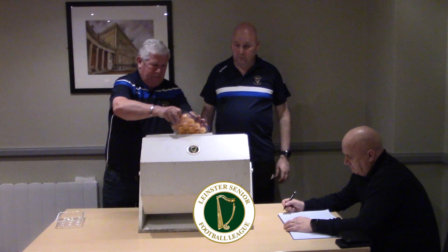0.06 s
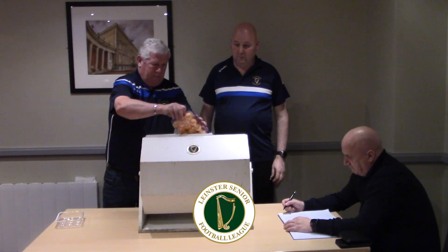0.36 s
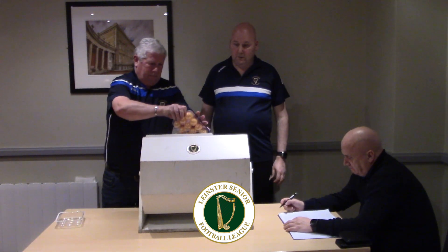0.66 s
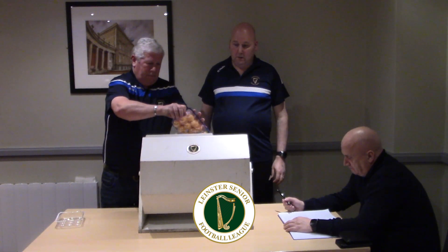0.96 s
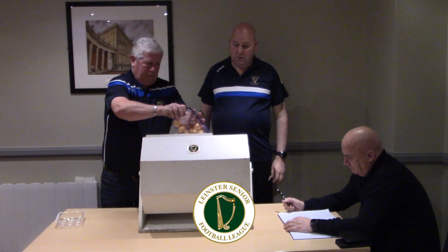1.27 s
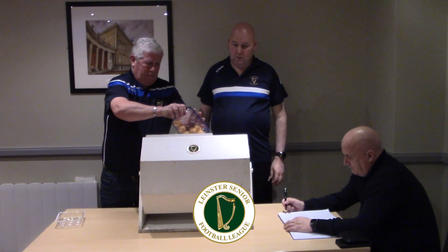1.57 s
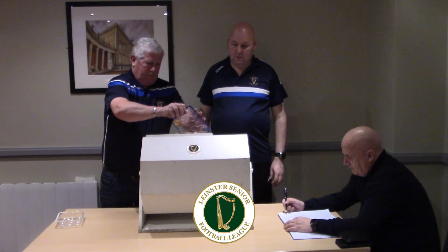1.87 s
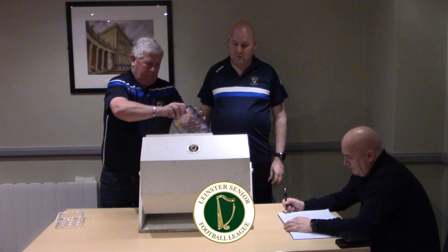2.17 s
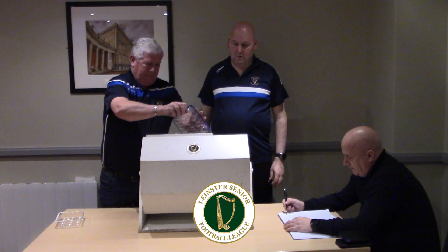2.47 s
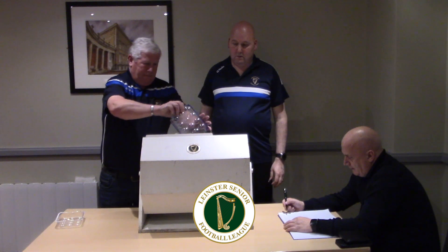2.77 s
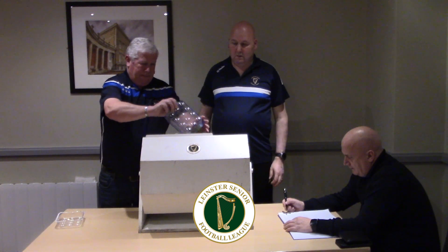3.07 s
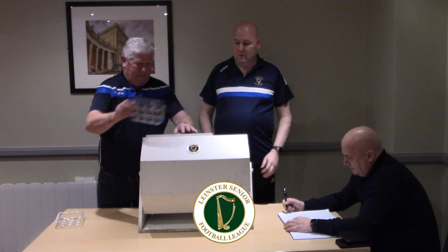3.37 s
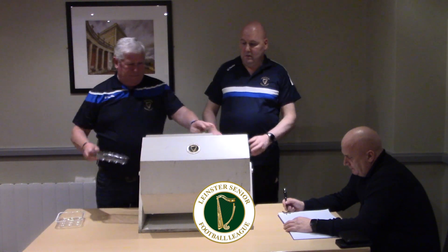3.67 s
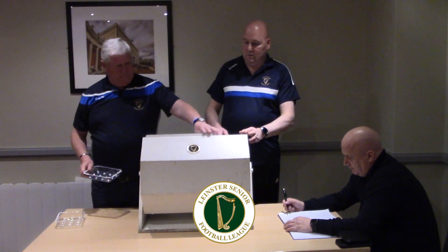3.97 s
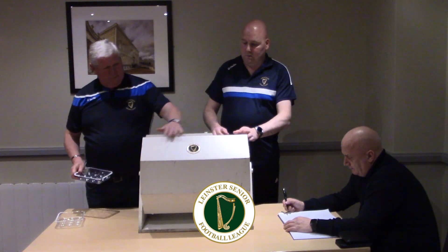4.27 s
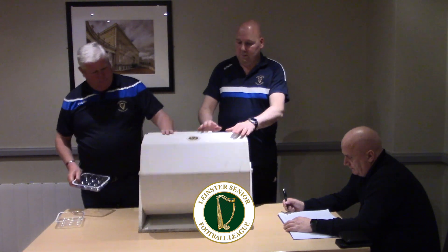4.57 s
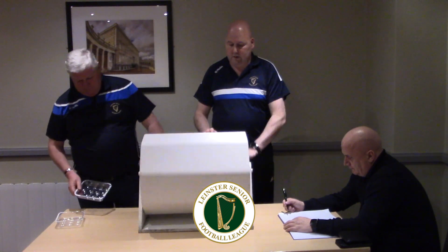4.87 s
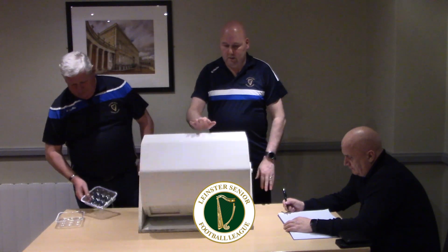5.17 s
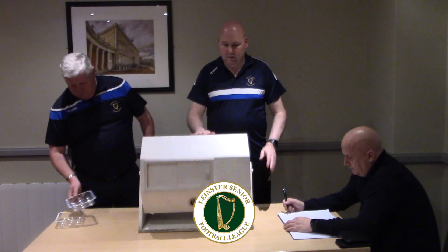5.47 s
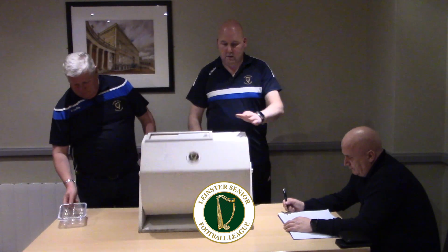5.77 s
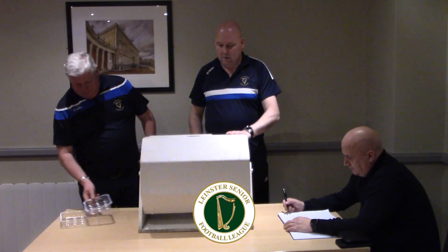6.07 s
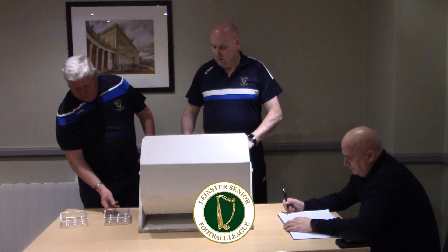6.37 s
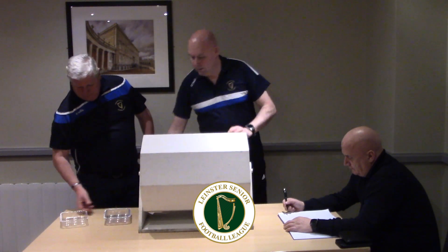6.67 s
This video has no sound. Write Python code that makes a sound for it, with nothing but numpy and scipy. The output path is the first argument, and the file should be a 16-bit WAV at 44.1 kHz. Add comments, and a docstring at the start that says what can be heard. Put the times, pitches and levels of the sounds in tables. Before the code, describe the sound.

For the first second a thin plastic tray crinkles faintly and balls click lightly inside it. From about 1.2 seconds hollow plastic balls drop into a wooden drum, knocking on the panels and clacking against each other with tiny high pings. The clatter is thickest from 2 to 3 seconds and dies away by about 3.7. The hatch bangs shut in a few knocks between 3.8 and 4 seconds, with a short hinge groan and a ball rocking lightly; the latch clicks at 4.4. Around 4.7 to 5 seconds the axle gives two brief groans as the drum starts turning. From then until the end, near 7 seconds, the balls tumble inside in a dense run of knocks and clacks over a low rolling rumble, the highest treble gradually dulling. A small room echoes the blows over a soft, steady hush.

```python
"""A thin plastic tray crinkles and clicks as hollow plastic balls tip out of it into a wooden draw drum.
The balls knock on the wood, clack together and ping. The hatch bangs shut, its hinge groans, a ball rocks
and the latch clicks. The drum groans on its axle as it starts to turn, and the balls roll and tumble
inside, slowly losing their highest treble. A small room echoes the blows over a soft, steady hush."""
import sys
import numpy as np
from scipy import signal
from scipy.fft import rfft, irfft, next_fast_len
from scipy.io import wavfile
from scipy.ndimage import uniform_filter1d, minimum_filter1d

SR = 44100
rng = np.random.default_rng(int(sys.argv[2]) if len(sys.argv) > 2 else 0)


def unload_audio(sound):
    """Save the sound as a 16-bit wav file, at the path given as the first command line argument."""
    columns = np.transpose(np.atleast_2d(sound))
    # keep every value between -1 and 1, then stretch to whole-number steps
    steps = np.round(np.clip(columns, -1, 1) * 32767)
    wavfile.write(sys.argv[1], SR, steps.astype(np.int16))


N = 305568


# Hard blows as the balls drop from the tray, and later from the turning walls.
# start_s, force_db, clack_db, tick_db (clack and tick are added to the force)
BALL_BLOWS = [(1.208, 0.5, -16.5, -25.5), (1.284, 1.5, -21, -25.5), (1.307, 3, -17, -26.5),
              (1.408, 0.5, -28, -31), (1.457, -3.5, -30, -34), (1.48, 5, -15, -26),
              (1.542, -6.5, -11.5, -20.5), (1.625, 3.5, -14, -29), (1.664, 1.5, -9, -23),
              (1.732, -0.5, -12.5, -23.5), (1.781, -2.5, -12.5, -27.5), (1.947, 3, -11.5, -25.5),
              (2.019, 2, -13.5, -24), (2.069, 4.5, -8, -21.5), (2.11, 2, -26, -31), (2.226, 1, -13, -30.5),
              (2.323, 3, -13, -26), (2.376, 7, -15.5, -26.5), (2.459, -1.5, -12, -26.5),
              (2.577, 0.5, -9, -28.5), (2.651, -0.5, -8, -24.5), (2.727, -8, -5, -15.5),
              (2.754, 3, -10, -26.5), (2.865, -6.5, -9.5, -27), (2.941, 2, -16.5, -24.5),
              (2.987, -3, -11, -29), (3.098, -10.5, -9.5, -26), (3.215, -4, -11, -30),
              (3.286, -7.5, -10.5, -29), (3.335, -4.5, -12.5, -35), (3.453, -6.5, -16, -31),
              (3.481, -1.5, -12, -27), (3.536, -1.5, -13, -29), (4.887, -4, -8.5, -27),
              (4.912, 4, -10.5, -29), (5.062, -0.5, -12.5, -24.5), (5.079, 3.5, -33, -29),
              (5.104, 8.5, -28, -29), (5.165, -2.5, -11, -29), (5.287, -4.5, -9.5, -21.5),
              (5.302, 4, -9.5, -27.5), (5.44, -1.5, -9.5, -24.5), (5.477, 0.5, -28, -34),
              (5.69, 1.5, -8.5, -26.5), (5.747, 1.5, -12, -46), (5.84, -0.5, -11, -22),
              (5.971, -1.5, -11.5, -22.5), (6.054, -11.5, -6, -22), (6.092, 0, -12.5, -36),
              (6.176, 2, -9, -29), (6.411, 1, -14, -32), (6.526, 1.5, -14.5, -29.5), (6.545, -8, -13, -27)]
def falling_balls():
    """Balls hit the wood and each other; once the hatch shuts, one rocks in three growing knocks."""
    rocking = [(4.133 + k * 0.0785, -14 + k * 1.5, -23, -51) for k in range(3)]
    return blows(BALL_BLOWS + rocking, knock_db=-5.5, clack_db=-1.5, tick_db=-1.5,
                 knock_s=0.083, clack_s=0.075, tick_s=0.12,
                 rise_s=0.0019, tick_rise_s=0.00039, snap=0.17, tick_snap=0.17, contrast=1.96)


def blows(rows, knock_db, clack_db, tick_db, knock_s, clack_s, tick_s,
          rise_s, tick_rise_s, snap, tick_snap, contrast=1):
    """Each blow shakes the panels (knock), the hollow shells (clack) and the spot it hits (tick)."""
    knocks, clacks, ticks = np.zeros((3, N))
    usual_clack = np.median([clack for _, _, clack, _ in rows])
    for start_s, force, clack, tick in rows:
        # ball on wood hardly clacks, ball on ball does
        hardness = usual_clack + contrast * (clack - usual_clack)
        add(knocks, start_s, amp(force + knock_db) * burst(knock_s, rise_s, snap))
        add(clacks, start_s, amp(force + hardness + clack_db) * burst(clack_s, rise_s, snap))
        add(ticks, start_s, amp(force + tick + tick_db) * burst(tick_s, tick_rise_s, tick_snap))
    return np.array([knocks, clacks, ticks])


def burst(ring_s, rise_s, snap, size=6144):
    """One contact: a sharp snap, then jumbled waves that build up and fade by 60 dB in ring_s."""
    t = np.arange(size) / SR
    fade = amp(-60 * t / ring_s) * (1 - np.exp(-t / rise_s))
    waves = unit_level(rng.standard_normal(size) * fade) * np.sqrt(np.mean(fade ** 2))
    waves[0] += snap * np.linalg.norm(fade)
    return waves


# How hard the heap is stirred as it fills, settles, then tumbles: time_s, level_db
STIRRING = [(0.95, -53), (1.15, -38), (1.45, -36), (1.8, -25), (1.929, -34), (2.02, -13), (2.42, -13),
            (2.55, -19), (3.2, -18), (3.66, -20.5), (3.78, -37), (4.76, -37), (4.82, -22), (5.03, -30),
            (5.12, -12.5), (5.9, -12.5), (6.699, -13.5), (6.93, -17)]
TICK_SLOPE = 0.88  # dB of tick for each dB of stirring
def jostling_heap(per_s=70, spread_db=8.5):
    """Light bumps of uneven strength and tone fill the gaps between the hard blows."""
    parts = np.zeros((3, N))
    part_spreads_db = (7.5, 7.5, 13)  # knock, clack, tick
    for k, (late, strength, *shares) in enumerate(rng.random((900, 5))):
        bump = amp(spread_db * strength) * burst(ring_s=0.06, rise_s=0.0005, snap=0.56, size=2048)
        for part, share, range_db in zip(parts, shares, part_spreads_db):
            add(part, (k + 2 * late) / per_s, amp(range_db * share) * bump)
    stir_db = over_time(STIRRING)
    return unit_level(parts) * amp([stir_db - 4, stir_db - 9, TICK_SLOPE * stir_db - 27])


# The tones of one hollow ball: pitch_ratio, level_db
SHELL_TONES = [(1, 3), (1.07, -3.5), (1.42, -13.5), (1.72, -26), (2.02, -20)]
def shell_pings(light_count=420, middle_hz=6045, ring_s=0.0086, spread_db=14):
    """At hard blows and light touches a ball pings at its own pitch; the spot hit favours some tones."""
    times_s, stir_db = np.transpose(STIRRING)
    when, strength = rng.random((light_count, 2)).T
    light_s = times_s[0] + (times_s[-1] - times_s[0]) * when
    light_db = TICK_SLOPE * np.interp(light_s, times_s, stir_db) - 7 + 20 * (strength - 1)
    hits = [(start_s, force + tick + 13.5) for start_s, force, _, tick in BALL_BLOWS]
    hits += zip(light_s, light_db)
    pitches_hz = middle_hz * (1 + 0.1 * rng.uniform(-1.08, 1, len(hits)))
    out, t = np.zeros(N), np.arange(2048) / SR
    swell = 1 - np.exp(-t / 0.0009)
    for (start_s, level_db), pitch_hz in zip(hits, pitches_hz):
        spot_db = spread_db * (rng.random(len(SHELL_TONES)) - 1)
        ping = sum(amp(tone_db + cut_db) * np.sin(2 * np.pi * pitch_hz * ratio * t)
                   for (ratio, tone_db), cut_db in zip(SHELL_TONES, spot_db))
        add(out, start_s, amp(level_db - 60 * t / ring_s) * swell * ping)
    return out


# The tone of each part of a blow: pitch_hz, level_db
KNOCK_TONE = [(100, -44), (200, -42.5), (280, -25), (345, -7.5), (480, -5), (600, -3), (800, 0.5), (930, 0),
              (1300, 0.5), (1650, -3.5), (1900, -14.5), (3000, -20), (8000, -75.5)]
CLACK_TONE = [(150, -97), (500, -80.5), (1400, 1.5), (1750, 3.5), (2300, 2.5), (2700, -4.5), (3200, -15.5),
              (3800, -18.5), (4600, -20.5), (8000, -39), (16000, -85)]
TICK_TONE = [(150, -97), (1000, -88), (2800, 10.5), (4500, 5), (6000, -0.5), (7200, -2), (8500, -1.5),
             (10500, -6.5), (13000, -10), (16000, -19)]
# Pitches at which the wooden drum rings: pitch_hz, width_hz, boost_db
DRUM_RINGS = [(361.6, 10.8, 8.5), (399.1, 22.3, 11), (460, 37, 2), (544, 15, 5), (680, 36, 4.5),
              (770, 35, 3), (747, 23, 0), (843, 35.4, 10), (1013, 28, 8), (1128, 66, 3.5), (1210, 13, 0.5),
              (1270, 41, 4.5), (1325, 42, 2.5), (1583, 48, 2), (1694, 73, 6), (1645, 37, -12),
              (1950, 57, 6), (1993, 34, 2), (2240, 180, 2.5), (2495, 65, 3), (2800, 210, 0.5),
              (3630, 530, 2), (8330, 360, 2.5)]
def wooden_body(parts, rings=DRUM_RINGS, tick_tone=TICK_TONE):
    """Knock, clack and tick all ring the same wood: the drum, unless other rings are given."""
    tones = (KNOCK_TONE, CLACK_TONE, tick_tone)
    return sum(colour(part, tone, rings) for part, tone in zip(parts, tones))


# How the shut hatch changes the sound from inside: pitch_hz, gain_db
SHUT_TONE = [(3000, 2.5), (6000, 2), (8500, 0), (11000, -4.5), (13000, -10), (16000, -13)]
def behind_hatch(sound, start_s=4.3, change_s=2.03):
    """Behind the shut hatch the highest treble slowly dulls, while the rest grows a little louder."""
    size = next_fast_len(N)
    gain = amp(at_pitch(SHUT_TONE, np.fft.rfftfreq(size, 1 / SR)))
    dull = irfft(rfft(sound, size) * gain, size)[:N]
    blend = np.clip((np.arange(N) / SR - start_s) / change_s, 0, 1)
    return sound + blend * (dull - sound)


# The hatch shutting and latching: start_s, force_db, clack_db, tick_db
HATCH_BLOWS = [(3.767, -1, -9.5, -42), (3.784, -6, -5, -42), (3.907, -3.5, -15.5, -38),
               (4.003, -3.5, -8.5, -47.5), (4.022, 2, -23, -46), (4.387, -17.5, -7, -28),
               (4.427, -18.5, -3, -11.5)]
# Pitches at which the hatch rings: pitch_hz, width_hz, boost_db
HATCH_RINGS = [(401, 21, 12.5), (435, 12, 6), (493, 20, 6), (645, 49, 7), (715, 33, -11), (844, 45, 3.5),
               (977, 44, 9), (1230, 75, 4.5), (1600, 110, 0), (2420, 110, 0), (3000, 180, 2)]
# The tone of the ticks of the hatch and its catch: pitch_hz, level_db
LATCH_TONE = [(150, -60), (1000, -29), (2900, 5.5), (4500, -1.5), (6000, -1), (8500, -4), (10500, -11.5),
              (13000, -20), (16000, -34)]
def hatch():
    """The hatch bangs shut, then its catch clicks."""
    parts = blows(HATCH_BLOWS, knock_db=-9.5, clack_db=-1, tick_db=10,
                  knock_s=0.12, clack_s=0.088, tick_s=0.065,
                  rise_s=0.0044, tick_rise_s=0.0009, snap=0.14, tick_snap=0.17)
    return wooden_body(parts, HATCH_RINGS, LATCH_TONE)


# Light blows as the tray tips: start_s, force_db, clack_db, tick_db
TRAY_BLOWS = [(0.061, -22, -23, -24), (0.122, -17.5, -18, -23.5), (0.298, -36.5, -7, -9),
              (0.398, -28.5, -27.5, -29), (0.432, -45, -12, -11), (0.634, -38, -14, -17.5),
              (0.801, -22.5, -14, -21), (0.936, -22.5, -14.5, -16.5), (1.059, -16, -6.5, -15),
              (1.139, -13.5, -15, -21)]
def tipping_tray():
    """Balls click in the tipping tray and ring the drum."""
    parts = blows(TRAY_BLOWS, knock_db=-14, clack_db=-5.5, tick_db=-0.5,
                  knock_s=0.11, clack_s=0.22, tick_s=0.11,
                  rise_s=0.0017, tick_rise_s=0.0011, snap=0.32, tick_snap=0.32)
    return wooden_body(parts)


# The hinge groans, then the axle: start_s, length_s, first_slips_per_s, last_slips_per_s, level_db
GROANS = [(4.006, 0.176, 111, 121, -20.5), (4.706, 0.26, 117, 97, -25.5), (4.894, 0.123, 101, 110, -17.5)]
# The tone of a groan: pitch_hz, level_db
GROAN_TONE = [(100, -63), (210, -35), (320, -21), (400, 6), (480, -1.5), (545, -23), (605, 2.5), (680, -3),
              (1100, -13), (2000, -44), (5000, -70)]
def groans(jitter=0.011, attack_s=0.027, release_s=0.029, fade_db_per_s=49):
    """A dry bearing sticks and slips almost evenly, so the wood groans at a sliding pitch."""
    out = np.zeros(N)
    for start_s, length_s, first_hz, last_hz, level_db in GROANS:
        t = np.arange(0, length_s, 1 / SR)
        waver = unit_level(uniform_filter1d(rng.standard_normal(SR), size=400))[:len(t)]
        slip_hz = np.linspace(first_hz, last_hz, len(t)) * (1 + jitter * waver)
        cycles = np.cumsum(slip_hz) / SR
        slips = sum(np.cos(2 * np.pi * k * cycles) for k in range(1, 16))
        groan = unit_level(colour(slips, GROAN_TONE)[:len(t)])
        grip = np.minimum(t / attack_s, 1) * np.minimum((length_s - t) / release_s, 1)
        add(out, start_s, groan * grip * amp(level_db - fade_db_per_s * t))
    return out


# How loudly the balls roll: time_s, level_db
ROLL_LEVEL = [(1.1, -72), (2.0, -61), (3.6, -43), (3.98, -53), (4.04, -32), (4.22, -46.5), (4.75, -36.5),
              (5.1, -39.5)]
# The tone of rolling: pitch_hz, level_db
ROLL_TONE = [(80, -35), (170, -14), (210, -9.5), (280, -0.5), (400, 7.5), (560, 4.5), (720, 6), (1200, -31),
             (4000, -55)]
# Pitches at which the panels ring under the balls: pitch_hz, width_hz, boost_db
PANEL_RINGS = [(223, 16, 10), (562, 110, 6)]
def rolling():
    """Balls running over wood make a low rumble."""
    return amp(over_time(ROLL_LEVEL)) * colour(rng.standard_normal(N), ROLL_TONE, PANEL_RINGS)


# The tray bending in the hand: start_s, length_s, level_db
TRAY_BENDS = [(0, 0.2, -51.5), (0.35, 0.14, -49), (1.015, 0.19, -48)]
# The tone of the crinkles: pitch_hz, level_db
CRINKLE_TONE = [(300, -22), (1500, -2), (3500, -2), (5200, -3), (7000, -6), (9000, -0.5), (11000, -9),
                (16000, -27)]
def tray_crinkle(per_s=1600):
    """Tiny crackles of thin plastic swell and fade with each bend."""
    bend = np.zeros(N)
    for start_s, length_s, level_db in TRAY_BENDS:
        t = np.arange(0, length_s, 1 / SR)
        add(bend, start_s, amp(level_db) * np.sin(np.pi * t / length_s))
    crackles = rng.standard_normal(N) * (rng.random(N) < per_s / SR)
    return bend * colour(unit_level(crackles), CRINKLE_TONE)


# How long the room's echo takes to fade by 60 dB: pitch_hz, fade_s
ROOM_FADE = [(200, 0.94), (500, 0.82), (1400, 0.45), (3500, 0.39), (7000, 0.18), (14000, 0.31)]
def room(sound, echo_db=-4, build_s=0.0059, patterns=6):
    """Echoes build up quickly and the bass lasts longest; several patterns take turns to stay smooth."""
    t, echoes = np.arange(N) / SR, np.zeros(N)
    size = SR // 2
    for k in range(patterns):
        hz, age_s, noise = signal.stft(rng.standard_normal(size), SR, nperseg=256)
        fade = amp(-60 * age_s / at_pitch(ROOM_FADE, hz)[:, None])
        tail = signal.istft(noise * fade, SR, nperseg=256)[1][:size]
        tail *= 1 - np.exp(-(t[:size] / build_s) ** 2)
        turn = np.minimum((t * 20 + k) % patterns, 2)  # the patterns take turns, 20 a second
        echoes += ring(sound * np.sin(np.pi * turn / 2), tail)
    return sound + amp(echo_db) * echoes


# The tone of the quiet room: pitch_hz, level_db
HUSH_TONE = [(30, -32), (120, -21), (210, -5.5), (330, 2), (420, 3.5), (600, 2), (900, -8.5), (1400, 0.5),
             (2500, -3.5), (4500, -11), (8300, -12.5), (12000, -21), (15500, -35)]
def room_hush(level_db=-49):
    """Soft, steady noise fills the room."""
    return amp(level_db) * colour(rng.standard_normal(N), HUSH_TONE)


def amp(db):
    """Turns decibels into a gain."""
    return 10 ** (np.asarray(db) / 20)


def unit_level(sound):
    """Scales a sound to an average (rms) level of one."""
    return sound / np.sqrt(np.mean(sound ** 2) + 1e-20)


def at_pitch(table, hz):
    """Looks up a table between its pitches, giving each octave equal room."""
    pitches_hz, values = np.transpose(table)
    return np.interp(np.log(hz + 1), np.log(pitches_hz + 1), values)


def over_time(table):
    """Joins a table's points into one value for each sample."""
    return np.interp(np.arange(N) / SR, *np.transpose(table))


def add(mix, start_s, sound):
    """Mixes a sound in at its start time."""
    part = mix[max(round(start_s * SR), 0):][:len(sound)]
    part += sound[:len(part)]


def ring(sound, tail):
    """Gives every sample a ringing tail, scaled to an energy of one."""
    return signal.oaconvolve(sound, tail / np.linalg.norm(tail))[:N]


def colour(sound, tone, rings=(), size=8192):
    """Gives a sound a broad tone, plus pitches that ring on after each hit."""
    hz = abs(np.fft.fftfreq(size, 1 / SR))
    boost = sum((amp(db) ** 2 - 1) / (1 + (2 * (hz - pitch) / width) ** 2) for pitch, width, db in rings)
    log_gain = np.log(amp(at_pitch(tone, hz))) + np.log(np.maximum(1 + boost, 0.5)) / 2
    spectrum = np.exp(np.conj(signal.hilbert(log_gain)))  # nothing rings before the hit
    return ring(sound, np.fft.ifft(spectrum).real[:size // 2])


def scene():
    """Balls, tray and hatch echo in the room; the groans and the hush are added on top."""
    tray = tipping_tray()
    balls = wooden_body(falling_balls() + jostling_heap())
    shutting = hatch()
    inside = behind_hatch(balls + shell_pings()) + rolling()
    outside = tray + shutting + tray_crinkle()
    hush = room_hush()
    return (room(inside + outside) + groans() + hush)[None]


def record(dry, bass_cut_hz=25, ceiling_db=-1.6, top_hz=15850):
    """Cuts the deepest bass, turns loud peaks down for a moment and removes the very highest treble."""
    thin = signal.sosfilt(signal.butter(1, bass_cut_hz, "high", fs=SR, output="sos"), dry)
    peak_gain = np.minimum(1, amp(ceiling_db) / (abs(thin) + 1e-9))
    smooth_gain = uniform_filter1d(minimum_filter1d(peak_gain, size=80), size=80)
    treble_cut = signal.firwin(511, top_hz, window=("kaiser", 9), fs=SR)
    return signal.oaconvolve(thin * smooth_gain, treble_cut[None], "same")


dry = scene()
out = record(dry)
unload_audio(out)
```